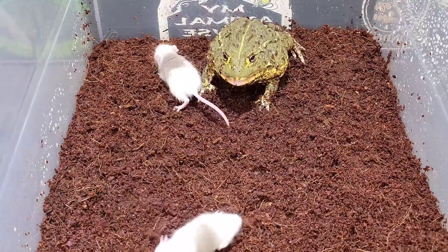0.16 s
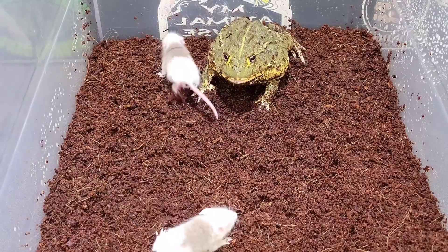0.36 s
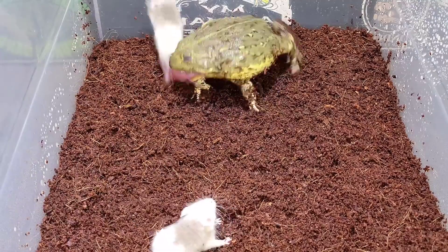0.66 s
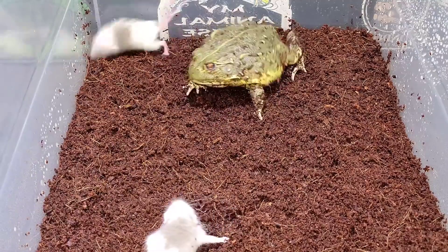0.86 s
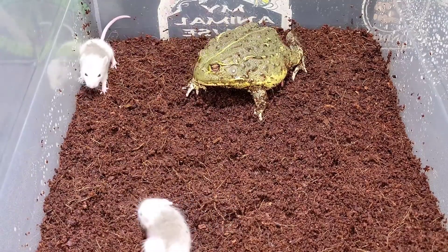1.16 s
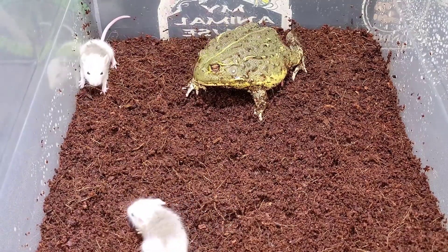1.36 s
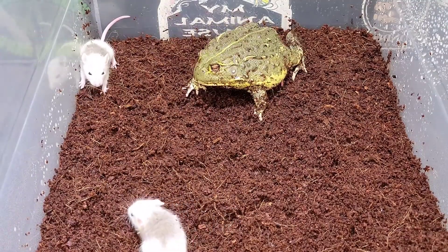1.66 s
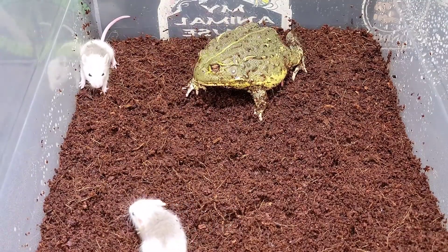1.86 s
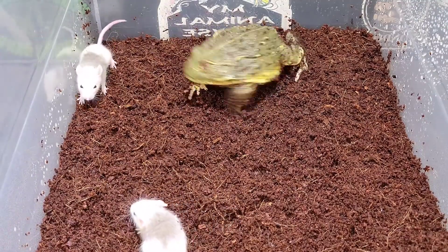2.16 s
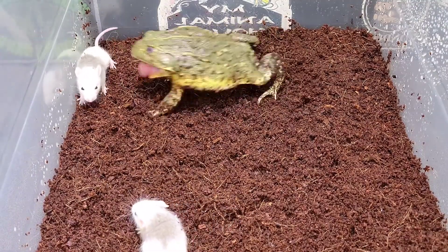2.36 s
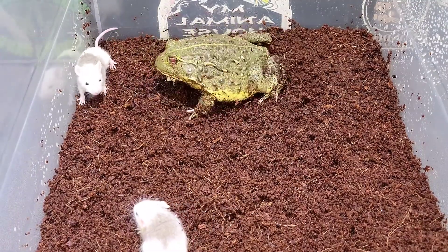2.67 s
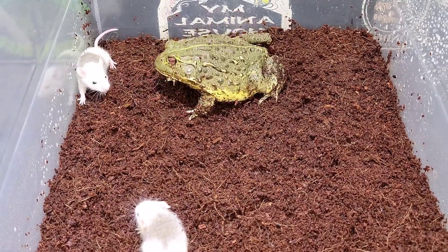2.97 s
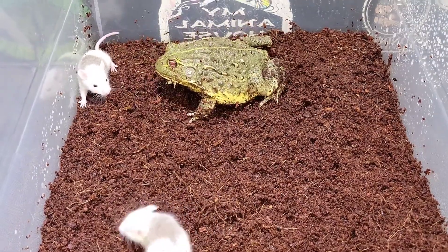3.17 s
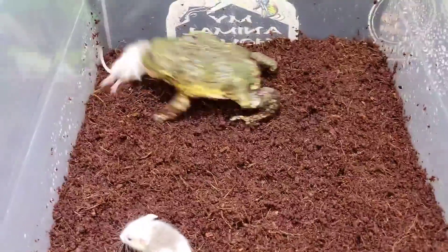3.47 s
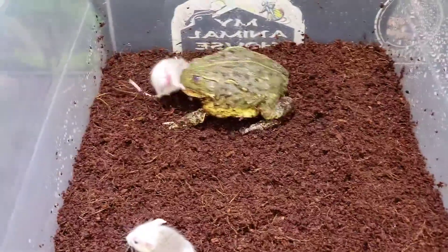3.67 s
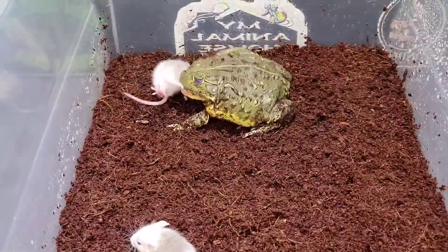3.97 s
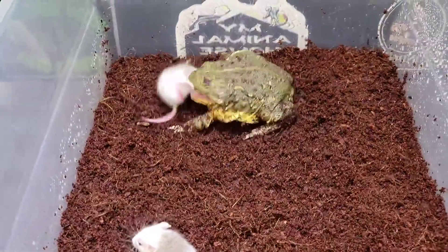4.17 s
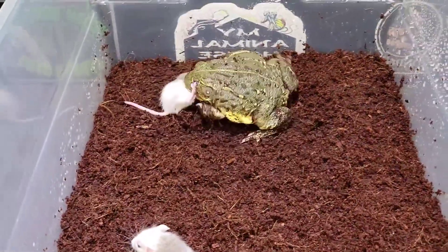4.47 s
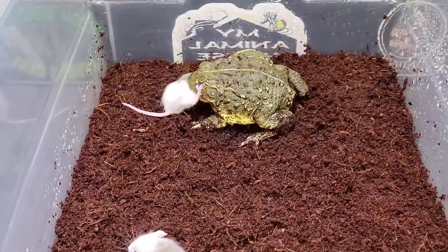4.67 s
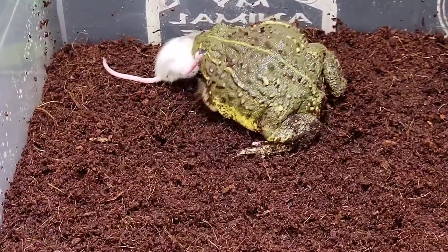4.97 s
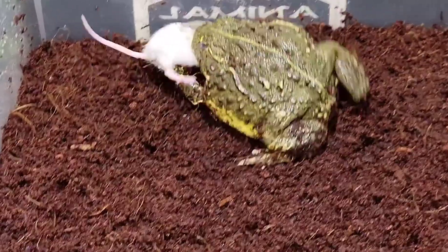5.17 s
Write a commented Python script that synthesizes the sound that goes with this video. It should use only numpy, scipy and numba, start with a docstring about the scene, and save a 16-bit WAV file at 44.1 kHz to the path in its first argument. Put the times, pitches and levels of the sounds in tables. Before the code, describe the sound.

Low thumps and crisp claw clicks open over crunchy bedding rustle, building to a hard plastic knock and a flurry of scratching. More taps and a heavier shuffle follow, then near stillness with sparse brushes. Late on, a mouse gives two tiny raspy squeaks. Heard closely in stereo in a small resonant tub, with a faint room bed.

```python
"""In a plastic tub, mice and a large frog move over fibre bedding under a stereo microphone.
Feet and bodies brush the fibres (filtered noise snaps), claws crack and knock on the walls (noise bursts
and decaying modes), landings thud in the floor (sagging sines) and a few short noisy pips sound.
A mouse squeaks twice near the end (shaken harmonics with air). The tub echoes and rumbles in a quiet room."""
import sys
import numpy as np
from scipy import signal
from scipy.fft import rfft, irfft, next_fast_len
from scipy.io import wavfile
from scipy.ndimage import uniform_filter1d
from numba import njit

SR = 44100
rng = np.random.default_rng(int(sys.argv[2]) if len(sys.argv) > 2 else 0)


def file_out(sig):
    """Save sig as 16-bit WAV at sys.argv[1]."""
    # one column per channel
    cols = np.atleast_2d(sig).T
    # limit, then scale
    lim = np.clip(cols, -1, 1)
    pcm = np.round(lim * 32767).astype(np.int16)
    wavfile.write(sys.argv[1], SR, pcm)


N = 235141
TOP_HZ = 16050  # upper limit of the squeak partials and of the recorder


def undb(db):
    """Turns dB into an amplitude factor."""
    return 10 ** (np.asarray(db) / 20)


def unit(x):
    """Scales a sound to an RMS of 1."""
    return x / np.sqrt(np.mean(x ** 2))


def colour(x, spectrum):
    """Filters along the last axis by (Hz, dB) points on a log-frequency axis."""
    size = next_fast_len(x.shape[-1])
    hz, db = np.transpose(spectrum)
    log_hz = np.log(np.fft.rfftfreq(size, 1 / SR) + 1)
    gain = undb(np.interp(log_hz, np.log(hz), db))
    return irfft(rfft(x, size) * gain, size)[..., :x.shape[-1]]


def walk(rate):
    """Random levels held for 1 / rate seconds, smoothed twice and scaled to an RMS of 1."""
    hold = int(SR / rate)
    steps = np.repeat(rng.standard_normal(N // hold + 1), hold)
    smooth = uniform_filter1d(uniform_filter1d(steps, hold), hold)
    return unit(smooth[:N])


def add(out, s, sound, pan_db=0.):
    """Lays a sound into both channels from time s; pan_db is left minus right."""
    i = int(s * SR)
    out[:, i:i + sound.shape[-1]] += undb([[pan_db / 2], [-pan_db / 2]]) * sound


def pair(size, alike):
    """Noise for two ports that share the given part of it."""
    mid, side = rng.standard_normal((2, size))
    alike = np.clip(alike, 0, 1)
    opposed = side * np.array([[1], [-1]])
    return np.sqrt((1 + alike) / 2) * mid + np.sqrt((1 - alike) / 2) * opposed


@njit
def band(x, hz, share):
    """State-variable band-pass whose centre may move; width = share of the centre."""
    y, b, l = np.empty(len(x)), 0., 0.
    for i in range(len(x)):
        g = np.tan(np.pi * hz[i] / SR)
        v = (b + g * (x[i] - l)) / (1 + g * (g + share))
        b, l, y[i] = 2 * v - b, l + 2 * g * v, share * v
    return y


def ring(modes, t, centre_hz, octaves):
    """Decaying modes (Hz, dB, t60 s), strongest near the centre, each blow a little different; peak 1."""
    attack_s = .0006
    hz, db, t60 = (c[:, None] for c in np.transpose(modes))
    chance = rng.standard_normal((3, *hz.shape))
    strength = undb(db + 2 * chance[0])
    reach = strength * np.exp(-.5 * (np.log2(hz / centre_hz) / octaves) ** 2)
    swing = np.sin(2 * np.pi * hz * (1 + 0.013 * chance[1]) * t + .7 * chance[2])
    modes_sum = np.sum(reach * swing * 1000. ** (-t / t60), axis=0)
    sound = modes_sum * (1 - np.exp(-t / attack_s))
    return sound / np.abs(sound).max()


# Tone of the room hiss. Each row: frequency in Hz, density in dB per Hz.
ROOM_HISS = [(150, -55), (250, -6), (589, -14), (739, -15.5), (944, -20), (1120, -5), (1710, -11),
             (2260, -16.5), (4170, -15), (6810, -26), (12100, -22.5), (16300, -15.5)]
ROOM_DB = -71.5  # before the lift of each channel


def room():
    """Faint hiss, unrelated left and right: coloured noise whose level drifts slowly."""
    hiss = unit(colour(rng.standard_normal((2, N)), ROOM_HISS))
    lift_db = np.array([[2.5], [3.5]])
    return hiss * undb(ROOM_DB + lift_db + 2.1 * walk(4.54))


# Level of the tub's low rumble. Each row: time in seconds, level in dB.
RUMBLE_LEVEL = [(0, -62.5), (.93, -68.5), (1.41, -65.5), (1.62, -72), (2.0, -74), (2.54, -71), (2.85, -75),
                (3.5, -66.5), (3.74, -74.5), (4.27, -70), (4.71, -76.5), (4.94, -71), (5.14, -71),
                (5.33, -68)]
# Tone of the rumble. Each row: frequency in Hz, gain in dB.
RUMBLE_TONE = [(12, -46), (20, -14), (40, -4), (59, -1.5), (86, 3.5), (177, -3), (221, -5.5), (260, -5.5),
               (340, -5), (570, -120)]


def rumble():
    """Low swaying of the tub, mostly alike in both channels: coloured noise with an unsteady level."""
    s, db = np.transpose(RUMBLE_LEVEL)
    mid, side = colour(rng.standard_normal((2, N)), RUMBLE_TONE)
    sway = unit(mid + 0.75 * side * np.array([[1], [-1]]))
    return sway * undb(np.interp(np.arange(N) / SR, s, db) + 2.0 * walk(16))


# Strokes of feet and bodies through the bedding. Each row: peak in seconds, level in dB, seconds to swell
# by 20 dB (sign ignored), seconds to fade by 20 dB, brush centre in Hz, fine-fibre fizz in dB against the
# brush, heavy-body scrape in dB against the brush, scrape centre in Hz, left minus right in dB.
BEDDING_STROKES = [(.178, -47, .0035, .022, 3260, -11, 1, 830, -2),
                   (.241, -70, .004, .06, 3120, 14, 3, 740, 3),
                   (.342, -45, .028, .03, 4000, 0, -17.5, 590, -2.5),
                   (.46, -55.5, 0.06, 0.12, 4140, 0.5, -15, 670, -0.5),
                   (.525, -57, .0035, .05, 3290, -6, 11, 1150, -4),
                   (0.611, -64.5, 0.15, 0.18, 3720, 8.5, 9, 860, -.6),
                   (.75, -65.5, -0.04, 0.46, 4540, 9, -10, 520, -5),
                   (0.957, -50, 0.0351, .045, 5400, 8.5, -5.5, 520, -4),
                   (1.09, -67, .1, .1, 3640, 1.5, -6, 583, -2),
                   (1.138, -44.5, .008, 0.1859, 4570, 5, 6, 635, 0.5),
                   (1.228, -39.5, .06, .11, 4600, -0.5, -6, 620, -1.5),
                   (1.32, -52.5, 0.14, 0.03, 3980, -5, -22.5, 600, -1),
                   (1.354, -51.5, .04, 0.08, 3660, -6, -3, 530, -1.5),
                   (1.518, -52, .06, 0.09, 3340, -6, -14.5, 342, -4),
                   (1.553, -36, .0035, .025, 3900, -25, -1, 700, -6.5),
                   (1.58, -56.5, .02, 0.11, 3900, -0.5, 2, 680, 6),
                   (1.883, -46, .004, 0.07, 2800, -30, 8, 616, 2.5),
                   (1.99, -62, .05, .12, 2300, -6, -7, 561, -3),
                   (2.135, -54, .08, 0.07, 2100, -14, -2, 1050, -2.5),
                   (2.79, -67.5, 0.2, 0.23, 3880, 1, -3, 406, -1.5),
                   (3.135, -57, 0.055, 0.12, 2300, -14, 5, 700, 0),
                   (3.285, -56, 0.03, 0.1243, 2400, -13, 6, 1200, -1),
                   (3.332, -49.5, 0.0752, 0.08, 3100, -13, -7, 990, -0.5),
                   (3.63, -71.5, -0.02, 0.11, 3540, 15.5, -14, 459, -1),
                   (3.882, -71.5, 0.1651, 0.04, 3360, -2, -21, 410, -1),
                   (4.165, -52, .1, 0.06, 3500, -20, -5, 1080, -5),
                   (4.195, -56, .06, .014, 3600, -20, -4, 900, -5),
                   (4.56, -72.5, 0.16, 0.35, 3150, -10, -10, 553, -5),
                   (5.018, -67, 0.08, 0.04, 4310, -5, -0.5, 333, -0.5),
                   (5.156, -69, 0.01, .05, 3440, -16, -10, 409, 0)]
# Constant stirring under the strokes. Each row: time in seconds, level in dB, scrape in dB against the brush.
BEDDING_STIR = [(0, -63.5, -2.5), (.1, -74, 9.5), (.45, -67, 0), (.88, -65.5, -0.5), (1.42, -69.5, 0.5),
                (1.7, -77.5, -1), (1.86, -69, -3), (2.25, -70, 0.5), (2.55, -69.5, 0), (2.95, -75, 0.5),
                (3.5, -68.5, -0.5), (3.8, -75.5, 0.5), (4.05, -87, 9), (4.8, -81, -1.5), (4.95, -82, 10.5),
                (5.33, -82, 10.5)]
# Tone of the snapping fibres. Each row: frequency in Hz, density in dB per Hz.
FIBRE_TONE = [(900, -9), (1400, -3), (2000, -2), (2800, 2), (4600, 1.5), (5800, -1), (7500, -3),
              (9500, -17), (11500, -5.5), (14000, -3), (15800, -9), (16400, -55)]
STIR_BRUSH_HZ, STIR_FIZZ_DB, STIR_SCRAPE_HZ, STIR_PAN_DB = 3360, 1.5, 400, 0
FIZZ_HZ = 7650  # fine fibres fizz above this
SWELL_CURVE = 1.7  # above 1 a stroke swells fast at first and rounds off at its peak


def rustle():
    """Dense snaps of fibres in clumps of changing pitch; light feet fizz, heavy bodies scrape lower."""
    t = np.arange(0, N / SR + .001, .001)
    s, stir_db, stir_scrape_db = np.transpose(BEDDING_STIR)
    s_peak, db, swell_s, fade_s, *colours = np.transpose(BEDDING_STROKES)[:, :, None]
    late = t - s_peak
    drop = np.where(late < 0, np.abs(late / swell_s) ** SWELL_CURVE, late / fade_s)
    strokes_db = np.maximum(db - 20 * drop, -150)

    # the stirring joins the strokes as one more row
    stirring = [STIR_BRUSH_HZ, STIR_FIZZ_DB, np.interp(t, s, stir_scrape_db), STIR_SCRAPE_HZ, STIR_PAN_DB]
    brush_hz, fizz_db, scrape_db, scrape_hz, pan_db = (
        np.vstack([stroke + 0 * late, stir + 0 * t]) for stroke, stir in zip(colours, stirring))
    power = undb(2 * np.vstack([strokes_db, np.interp(t, s, stir_db)]))

    def spread(v):
        """Stretches a curve from 1 ms steps to samples."""
        return np.interp(np.arange(N) / SR, t, v)

    def gain(layer_db):
        """Adds up the powers of all strokes in one layer."""
        return spread(np.sqrt(np.sum(power * undb(2 * layer_db), axis=0)))

    # averages by power: the loudest stroke of the moment leads the colour and the side
    brush_hz, pan_db = (spread(np.average(v, axis=0, weights=power)) for v in (brush_hz, pan_db))
    scrape_hz = spread(np.average(scrape_hz, axis=0, weights=power * undb(2 * scrape_db)))

    # snaps come from many spots, so the ports hear them differently
    ports = pair(N, 0.4)
    snap_db = 2.4 * np.minimum(rng.exponential(size=N), 6) + 1.5 * walk(120)
    fibres = colour(ports * undb(snap_db), FIBRE_TONE)
    fizz = signal.sosfilt(signal.butter(4, FIZZ_HZ, "high", fs=SR, output="sos"), fibres)

    brush, total = 0, 0
    for hz in np.geomspace(1400, 7400, num=14):
        reach = undb(-10.5 * np.log2(hz / brush_hz) ** 2)
        clumps = undb(2.7 * walk(150))  # each size of fibre comes and goes on its own
        peak = signal.iirpeak(hz, 4, fs=SR)
        narrow = signal.lfilter(*peak, clumps * signal.lfilter(*peak, fibres))
        brush = brush + reach * narrow
        total = total + reach ** 2
    brush = brush / np.sqrt(total)

    grit = pair(N, 0.73) * undb(2.3 * walk(110))
    scrape = np.array([band(band(v, scrape_hz, 0.91), 1.17 * scrape_hz, 5.2) for v in grit])
    scrape = scrape / np.sqrt(scrape_hz)  # same power wherever the centre lies

    mix = gain(0) * unit(brush)
    mix = mix + gain(fizz_db) * unit(fizz)
    mix = mix + gain(scrape_db) * unit(scrape)
    return mix * undb(np.array([pan_db, -pan_db]) / 2)


# Soft landings. Each row: start in seconds, level in dB, nominal pitch in Hz.
LANDINGS = [(.057, -34, 200), (.072, -32.5, 94.5), (.17, -44.5, 71), (.521, -48, 205), (.602, -44, 244),
            (.845, -36, 92), (1.134, -44, 94), (1.158, -42, 300), (1.26, -50, 87), (1.355, -52, 176),
            (1.522, -43, 195), (1.549, -35.5, 111), (1.884, -45.5, 257), (2.087, -58, 158),
            (2.187, -47.5, 194), (3.681, -52, 102)]
THUD_T60_S, THUD_LAG_S = 0.11, 0.00067
FLOOR_HZ, FLOOR_T60_S, FLOOR_DB = 66.6, 0.29, -13.5  # the tub floor's own swing, against the landing


def thuds():
    """A landing swings for a few cycles, sagging in pitch, and leaves the tub floor swaying."""
    out, t = np.zeros((2, N)), np.arange(SR // 2) / SR
    floor_fade = 1000. ** (-t / FLOOR_T60_S) * (1 - np.exp(-t / 0.06))
    sway = undb(FLOOR_DB) * np.sin(2 * np.pi * FLOOR_HZ * t) * floor_fade
    fade = (1 - np.exp(-t / 0.0018)) * 1000. ** (-t / THUD_T60_S)
    for s, db, hz in LANDINGS:
        # the pitch sags from just above hz to 0.716 of it
        phase = 2 * np.pi * hz * (0.716 * t + 0.3 * 0.03 * (1 - np.exp(-t / 0.029)))
        add(out, s, undb(db) * (np.sin(phase) * fade + sway), -1.5)
    # the case carries the swing to the left port a little later
    return np.array([np.roll(out[0], int(THUD_LAG_S * SR)), out[1]])


# Claws and feet on plastic. Each row: start in seconds, crack level in dB, crack centre in Hz, crack decay
# (to 1/e) in seconds, wall ring level in dB, struck panel in Hz, ring t60 in seconds, left minus right in dB.
CLAW_KNOCKS = [(.062, -43, 1900, .0017, -57, 426, .1, 5.5), (.1753, -31, 3400, .0022, -30, 870, .032, -2),
               (.2022, -37, 2880, .0034, -40, 1300, .03, 4), (.2248, -57, 2520, .0032, -45.5, 870, .05, -8),
               (.2394, -49, 6600, .0075, -61, 541, .1, 2), (.3314, -46, 5000, .005, -60, 1300, .05, -2),
               (.5217, -34, 3620, .004, -27, 1090, .032, -10), (.5374, -62, 2320, .004, -36, 1090, .06, -3),
               (.5883, -45.5, 5940, .013, -36, 1080, .06, -10), (.8883, -36, 2080, .0047, -57, 570, .1, -5),
               (1.0291, -64, 5460, .0048, -52, 950, .07, -6), (1.081, -40, 3480, .0027, -49, 1060, .06, -4),
               (1.1354, -44, 6960, .0063, -33, 640, .12, -5), (1.1454, -36, 4400, .005, -45, 700, .08, -5),
               (1.1605, -16, 4100, .006, -27, 800, .06, -6.5), (1.165, -24, 6300, .004, -31, 1300, .05, -6),
               (1.1996, -27.5, 4300, .008, -41, 640, .1, -2), (1.3533, -40, 4150, .004, -37, 600, .05, -6),
               (1.3664, -40, 3260, .005, -51, 606, .1, -5), (1.4247, -38, 3970, .0025, -65, 546, .1, 0),
               (1.4658, -42, 4460, .005, -50, 880, .07, -9), (1.5223, -31, 2900, .0064, -47, 280, .13, -1),
               (1.5508, -30, 6000, .004, -39, 910, .07, 2), (1.8794, -32.5, 2700, .007, -30.5, 690, .1, -3),
               (1.9784, -39, 2300, .0038, -57, 900, .06, -3.5),
               (2.0078, -44, 1890, .0036, -52, 1150, .06, -4),
               (2.0552, -43, 2400, .004, -50, 1200, .07, 4.5), (2.0842, -34, 2800, .0055, -48, 900, .05, 2),
               (2.141, -45, 2120, .0027, -70, 1150, .06, -9),
               (2.1894, -45.5, 2140, .0055, -51.5, 480, .12, 0),
               (2.2776, -46, 3000, .007, -58, 1300, .05, -5.5),
               (2.2926, -47.5, 2400, .0059, -70, 899, .07, -2),
               (3.6292, -36, 3640, .0035, -65, 533, .1, -3), (3.68, -46, 3000, .004, -56, 600, .1, 6),
               (4.3846, -58, 2980, .017, -65, 530, .1, 5)]
# Wall modes of the tub. Each row: frequency in Hz, level in dB, share of the ring time (no unit).
WALL_MODES = [(245, -4, 1.4), (328, -3, 1.4), (365, -6, 1.2), (480, -7, 1.1), (620, 0, 1.1), (662, -2, 1.1),
              (780, -6, .9), (888, 2, .9), (1040, 1, .8), (1135, -5, .8), (1355, -10, .8)]
# Short high modes that a claw rings. Each row: frequency in Hz, level in dB, t60 in seconds.
TREBLE_MODES = [(1832, 6, 0.11), (2129, 7.5, 0.053), (2385, -2.5, 0.25), (3010, -5, 0.13), (3660, 2, 0.03),
                (4230, 8.5, 0.027), (4380, -3, 0.04), (4950, 2, 0.035), (6200, -4, 0.031), (7250, -2, 0.04)]
PANEL_OCTAVES = .27  # how far from the struck panel the wall modes still answer
FIZZ_DB_AT_4K, FIZZ_DB_PER_OCTAVE = -30, 33  # against the crack; a brighter crack fizzes more
PAT_DB, PAT_HZ, PAT_S = -3, 340, .022  # loose bedding shaken by a knock


def knocks():
    """A crack of a few ms with treble ring and fizz, then the struck panel's modes over a pat of bedding."""
    out, t = np.zeros((2, N)), np.arange(SR // 5) / SR
    high = signal.butter(4, 10500, "high", fs=SR, output="sos")
    pat_peak = signal.iirpeak(PAT_HZ, 1.2, fs=SR)
    for s, crack_db, crack_hz, crack_s, ring_db, panel_hz, ring_s, pan_db in CLAW_KNOCKS:
        noise, fade = pair(len(t), 0.15), np.exp(-t / crack_s)
        noise[:, 3:6] += 2.6 * np.array([[0.4, 0.66, 0.73]])  # the first contact is one sharp tick
        crack_peak = signal.iirpeak(crack_hz, 1.05, fs=SR)
        crack = signal.lfilter(*crack_peak, noise * fade + 1e-18) * np.sqrt(3200 / crack_hz)
        crack = crack + .35 * ring(TREBLE_MODES, t, crack_hz, .4)

        fizz_db = crack_db + FIZZ_DB_AT_4K + FIZZ_DB_PER_OCTAVE * np.log2(crack_hz / 4000)
        fizz = unit(signal.sosfilt(high, noise)) * fade

        wall = ring(np.multiply(WALL_MODES, [1, 1, ring_s]), t, panel_hz, PANEL_OCTAVES)
        pat = signal.lfilter(*pat_peak, pair(len(t), .8)) * np.exp(-t / PAT_S)
        wall = wall + undb(PAT_DB) * pat
        add(out, s, undb(crack_db) * crack + undb(fizz_db) * fizz + undb(ring_db) * wall, pan_db)
    return out


# Short pips. Each row: start in seconds, peak in dB, pitch in Hz, length in seconds.
NOISY_PIPS = [(1.33, -36, 3750, 0.004), (2.77, -53.5, 4000, .022), (3.062, -55.5, 3340, 0.014),
              (3.851, -58.5, 3460, 0.047), (5.005, -62, 5250, 0.032)]
PIP_WOBBLE_HZ = 196


def pips():
    """Narrow noisy tones with a rounded swell: sines whose pitch wobbles at random."""
    out = np.zeros((2, N))
    for s, db, hz, length in NOISY_PIPS:
        t = np.arange(int(length * SR)) / SR
        smooth = uniform_filter1d(rng.standard_normal(len(t)), size=40) * np.sqrt(40)
        phase = 2 * np.pi * np.cumsum(hz + PIP_WOBBLE_HZ * smooth) / SR
        add(out, s, undb(db) * np.sin(phase) * np.sin(np.pi * t / length), -2.)
    return out


# Mouse squeaks, the first breaking to a higher note held in its own list.
# Each row: time in seconds, pitch in Hz, level in dB, roughness from 0 to 1.
MOUSE_SQUEAKS = [
    [(4.2745, 2500, -48, .5), (4.277, 2460, -38, .4), (4.285, 2390, -38, .25), (4.294, 2350, -44, .3),
     (4.312, 2330, -49, .3), (4.316, 2330, -62, .3)],
    [(4.283, 2620, -50, .15), (4.288, 2680, -36, .2), (4.297, 2810, -32, .17), (4.3, 2830, -44, .25),
     (4.312, 2900, -41, .25), (4.316, 2860, -54, .3), (4.335, 2860, -56, .5), (4.34, 2860, -68, .5)],
    [(4.43, 1400, -60, .4), (4.436, 1420, -44, .45), (4.438, 1430, -35, .35), (4.441, 1480, -41, .25),
     (4.443, 1490, -30, .2), (4.45, 1450, -36, .25), (4.452, 1430, -29, .2), (4.458, 1430, -32, .18),
     (4.462, 1500, -31, .28), (4.474, 1500, -37, .55), (4.48, 1490, -48, .6), (4.5, 1490, -51, .65),
     (4.503, 1490, -56, .6), (4.53, 1490, -58, .6), (4.536, 1490, -70, .6)],
]
# The mouse's throat as heard. Each row: frequency in Hz, gain in dB.
MOUSE_THROAT = [(1400, -27), (2100, -18), (2500, -5), (2900, -1), (3600, -12), (4500, -4), (5700, 0),
                (6500, 2), (7200, 11), (7800, 6), (8500, -13), (9600, -14), (10400, -7), (11200, -13),
                (12100, -7), (13300, -4), (14000, -10), (14800, 1), (16300, -6)]
AIR_DB, AIR_DB_PER_ROUGH = -19, 28  # escaping air against the tone
PARTIAL_FLICKER_DB = 11  # per unit of roughness, each partial on its own


def squeaks():
    """A harmonic whistle and escaping air through one throat; roughness shakes pitch and strength."""
    out = np.zeros((2, N))
    for rows in MOUSE_SQUEAKS:
        s, *columns = np.transpose(rows)
        t = np.arange(s[0], s[-1], 1 / SR)
        hz, db, rough = (np.interp(t, s, c) for c in columns)

        def shake(size):
            """Smoothed noise with an RMS of 1."""
            return unit(uniform_filter1d(rng.standard_normal(len(t)), size=size))

        pitch_shake, level_shake = shake(50), shake(50)
        phase = 2 * np.pi * np.cumsum(hz * (1 + 0.045 * rough * pitch_shake)) / SR
        tone = 0
        for k in range(1, 12):
            flicker = undb(PARTIAL_FLICKER_DB * rough * shake(180))
            tone = tone + flicker * np.sin(k * phase + k * k) * (k * hz < TOP_HZ)
        air = unit(colour(rng.standard_normal(len(t)), MOUSE_THROAT))
        voice = unit(colour(tone, MOUSE_THROAT)) + undb(AIR_DB + AIR_DB_PER_ROUGH * rough) * air
        throb = undb(7 * rough * np.tanh(level_shake))
        add(out, s[0], voice * undb(db) * throb, -2.5)
    return out


# Tone of the left port. Each row: frequency in Hz, gain in dB.
LEFT_TONE = [(2000, 0.5), (5000, 0), (9000, -2), (15000, -8)]
# The action moves from the right of the microphone to its front.
# Each row: time in seconds, delay at the left port in seconds.
LEFT_DELAY = [(0, 0.00029), (2.3, 0.00028), (2.7, .0001), (5.33, 0.00006)]
NEAR_WALL_DB, TUB_DB, TUB_T60_S = -8.5, -11.5, 0.18
WALL_ECHO_DB, WALL_ECHO_T60_S = -22, 0.08  # the time is scaled by each wall mode's share
ROOM_ECHO_DB, ROOM_T60_S = -21, .4  # the room beyond the tub answers softly
SQUEAK_ECHO_DB = -2.5  # a voice in the air stirs the walls less than a foot does


def tub(feet, voice):
    """Echoes by convolution with fading noise and modes; left hears direct sound later, and duller overall."""
    t, now = np.arange(SR // 3) / SR, np.arange(N) / SR
    noise = rng.standard_normal((3, 2, len(t)))  # different at each port
    near = colour(noise[0], [(800, -1), (2500, 2.0), (16000, -2.5)]) * np.exp(-t / 0.0051)
    tail = colour(noise[1], [(150, 0.0), (600, -2.5), (5000, -2.5), (16000, -10.0)])
    tail = tail * 1000. ** (-t / TUB_T60_S)
    far = colour(noise[2], [(300, -8), (2800, 0), (4400, -5), (7000, -11), (16000, -22)])
    far = far * 1000. ** (-t / ROOM_T60_S)

    # these sounds also set the walls humming at their modes
    modes = np.vstack([np.multiply(WALL_MODES, [1, 1, WALL_ECHO_T60_S]), TREBLE_MODES])
    hum = ring(modes, t, 2200.0, 9.8)
    echo = undb(NEAR_WALL_DB) * unit(near) + undb(TUB_DB) * unit(tail)
    echo = echo + undb(WALL_ECHO_DB) * unit(hum) + undb(ROOM_ECHO_DB) * unit(far)
    echo = echo / np.sqrt(len(t))

    wet = signal.oaconvolve(feet + undb(SQUEAK_ECHO_DB) * voice, echo, axes=1)[:, :N]
    direct = feet + voice
    late = np.round((now - np.interp(now, *np.transpose(LEFT_DELAY))) * SR).astype(int)
    left = colour(direct[0, np.maximum(late, 0)] + wet[0], LEFT_TONE)
    return np.array([left, direct[1] + wet[1]])


def scene():
    """Movement and voices echo in the tub; landings, rumble and room hiss join without echo."""
    return tub(rustle() + knocks(), pips() + squeaks()) + thuds() + rumble() + room()


def record(dry):
    """The recorder cuts the top with a steep low-pass."""
    return signal.sosfilt(signal.ellip(10, .2, 60, TOP_HZ, fs=SR, output="sos"), dry)


dry = scene()
out = record(dry)
file_out(out)
```